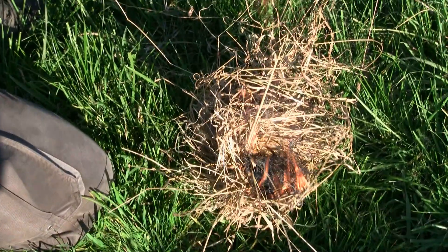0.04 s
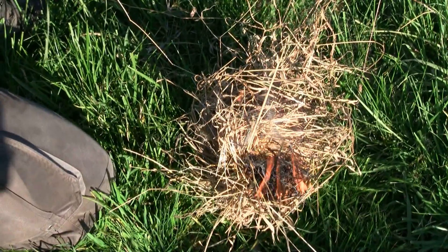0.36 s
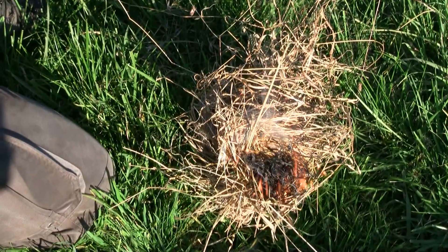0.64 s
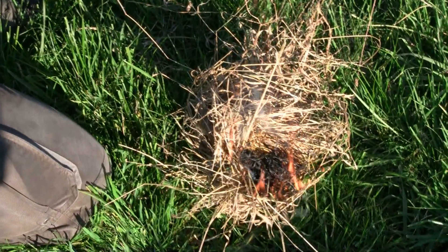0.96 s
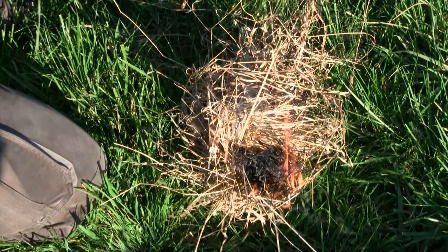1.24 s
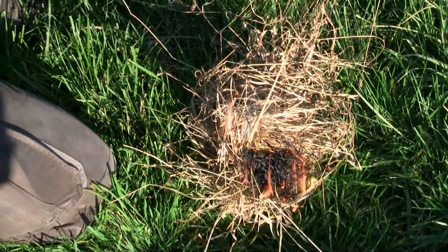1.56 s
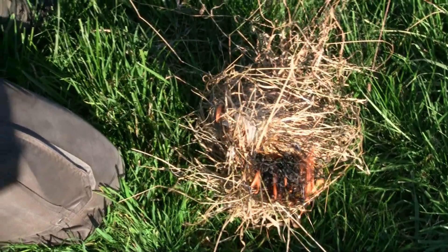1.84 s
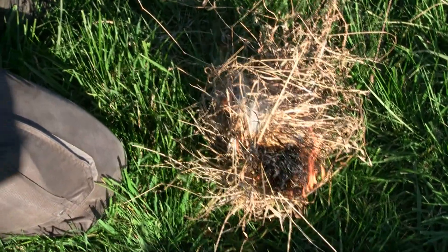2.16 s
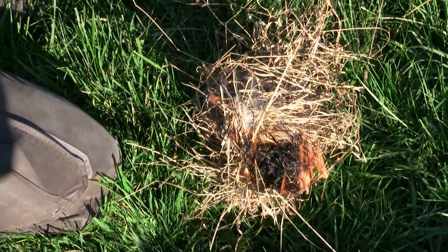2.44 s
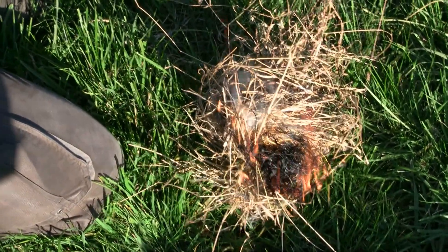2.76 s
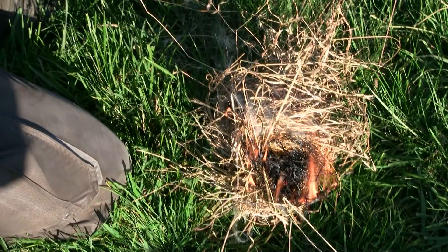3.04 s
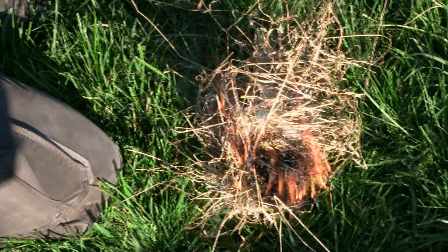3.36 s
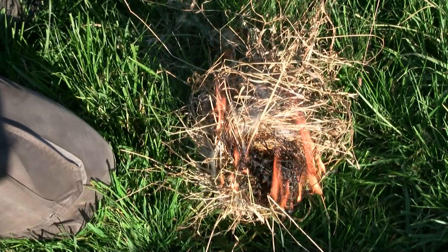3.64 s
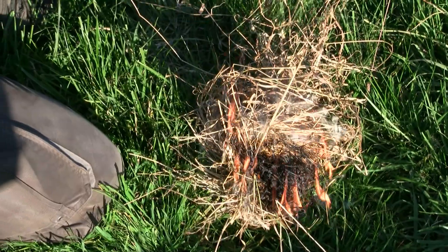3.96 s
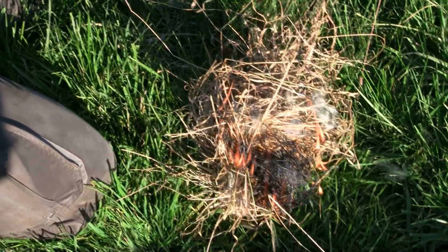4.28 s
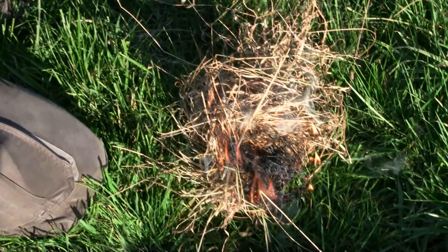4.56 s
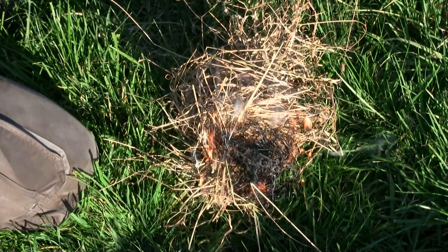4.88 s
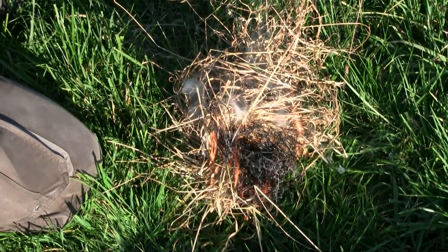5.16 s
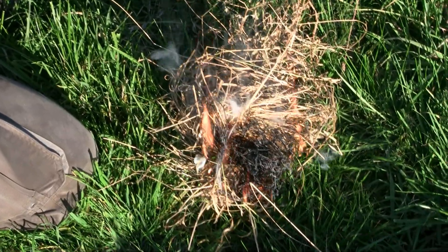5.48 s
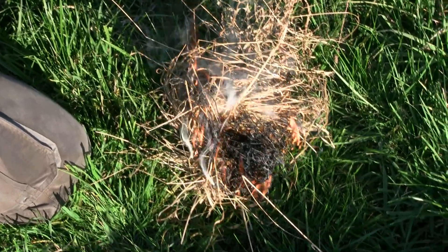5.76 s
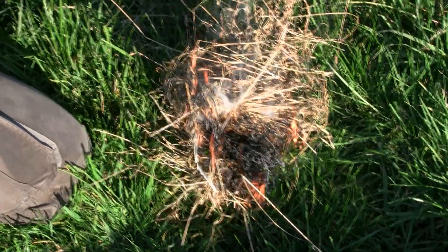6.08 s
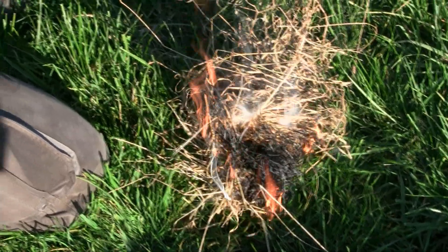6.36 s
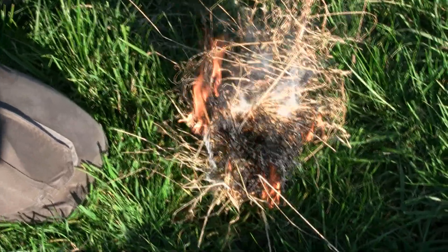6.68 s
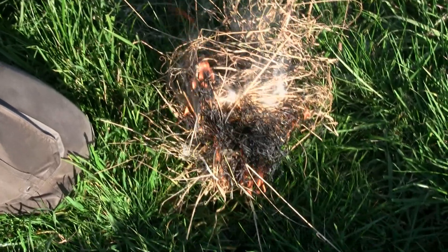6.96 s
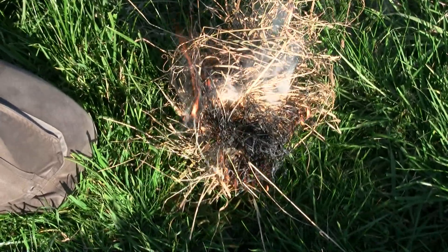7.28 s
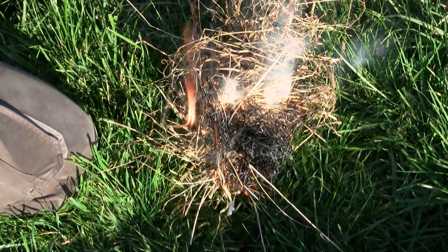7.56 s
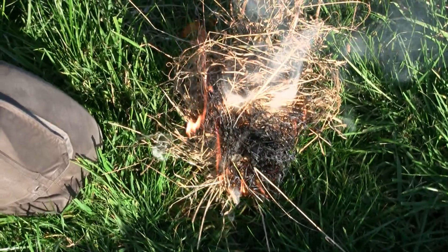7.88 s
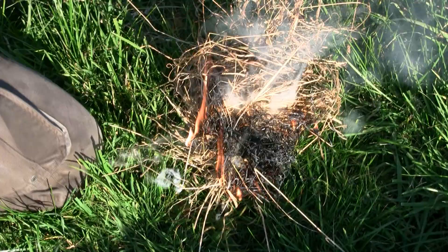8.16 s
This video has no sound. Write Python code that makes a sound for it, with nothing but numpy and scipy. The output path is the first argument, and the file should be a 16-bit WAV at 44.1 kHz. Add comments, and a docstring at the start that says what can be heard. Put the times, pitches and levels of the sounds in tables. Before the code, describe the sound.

Sharp, irregular snaps jump out of the light ticking of a straw fire, heard up close in stereo in the open air. The flame gives one soft puff early on, and damp stalks sputter and sizzle, more so near the end. A few snaps are loud enough to overload briefly. Faint, long, falling bird whistles come and go in the distance, over a steady wash of traffic and humming engines.

```python
"""A small heap of straw burns on a lawn, close to a stereo microphone.
Hollow stalks burst in dry snaps over the fine crackle of fibres, and damp straw vents steam.
Pockets of gas ignite with soft thuds and the flame puffs once; the loudest snaps overload the input.
Far off, a bird of prey whistles in long falling calls, a small bird adds two thin notes,
and two engines drone over a wash of traffic."""
import sys
import numpy as np
from scipy import signal
from scipy.fft import rfft, irfft
from scipy.io import wavfile

SR = 44100
rng = np.random.default_rng(int(sys.argv[2]) if len(sys.argv) > 2 else 0)


def to_wav(s):
    """Save 16-bit WAV."""
    ch = np.atleast_2d(s).T  # columns
    pcm = np.round(np.clip(ch, -1, 1) * 32767)  # PCM
    wavfile.write(sys.argv[1], SR, pcm.astype(np.int16))


N = 366912
TIME = np.arange(N) / SR

# bursting stalks: (time [s], level [dB], thump [dB], body [dB], treble [dB],
# resonance of the hollow stalk [Hz], delay of the ground echo [s])
STALK_BURSTS = [(0.164, -28, -5, 1, -1, 6480, .00099), (0.226, 6.5, -7, 0, -11, 6340, 0.00071),
                (.2291, 0.5, -2, -4, 2, 7000, 0.00066), (0.4578, 12.5, -6.5, 3, -13.5, 13200, 0.00064),
                (.5187, -28, -5, -4, 6, 5560, 0.00073), (.6755, -27.5, -5, -7, -9, 7000, 0.00074),
                (.7419, 4.5, -2.5, -2, 1.5, 5900, 0.00081), (0.7823, 13.5, -3, 0.5, -9, 3420, 0.000745),
                (0.926, -25.5, -5, 14.5, -31, 2200, 0.00044), (1.0971, -25, -5, -6, -1, 5560, 0.00086),
                (1.1347, -22, -8, -14, -1, 6000, .00081), (1.2124, -31.5, -5, 0, 0, 4080, .00033),
                (1.2588, -33, -5, 0, 5, 5560, 0.00081), (1.5753, 4.5, -0.5, 1.5, -4.5, 10200, 0.00075),
                (1.6842, -20.5, -5, 7, 3, 4410, 0.00035), (1.7184, -21, -5, 3, -8, 4760, .0008),
                (1.7318, -11.5, -6, -5, -5.5, 1890, 0.00081), (1.824, -30.5, -5, -4, 5, 6000, 0.00078),
                (1.9255, 9, -2, 4, -10, 4100, 0.00054), (2.1001, 13, -17, -3.5, -11.5, 15000, 0.00055),
                (2.1186, -5.5, 4, 5, -6, 3870, .00056), (2.5927, -18, 3, 1, -1, 9520, .00081),
                (2.697, -19.5, -2, -9, -8, 2700, 0.00054), (2.801, -31, -5, -2, 6, 6100, .0007),
                (2.8265, -27.5, -3, -2, 1, 5140, .00083), (2.8647, -20.5, -5, 4, -5, 3440, .00042),
                (2.9661, -6.5, -17, 0, -12.5, 5450, 0.00078), (3.1293, 5.5, -6.5, -1, -10, 8500, 0.00061),
                (4.0119, -21.5, -3, -13, 3, 6480, .00035), (4.1986, -10.5, 10, 3, -1, 5140, 0.00064),
                (4.259, -23.5, -5, -2, 5, 5140, .00032), (4.3588, -22.5, -5, 4, -1, 2040, .00083),
                (4.3794, -24, -5, -4, 8, 6000, .00073), (4.6031, 3, 6, 1.5, 1.5, 3000, 0.00049),
                (4.6646, -18.5, -7, -8, -2, 5560, .0008), (4.8046, -29.5, -5, 2, 1, 6480, 0.00039),
                (4.8537, -16, 2, 2, -13, 10290, .00061), (4.914, 16.5, -1.5, 0, -10.5, 6900, 0.00045),
                (5.2497, -8.5, 12.5, 8, -8.5, 10100, 0.0005), (5.272, -26, -5, -3, 3, 9500, 0.00057),
                (5.528, -26.5, -7, 13, -4, 4760, .00056), (5.5697, -24.5, -9, -5, -13, 5130, .00081),
                (5.604, -22, -7, -6, -9, 8160, .0012), (5.6848, -1.5, -15, -1, -9.5, 3300, 0.00039),
                (5.717, -24.5, -5, 0, 3, 3780, .00065), (5.7416, -26, -5, -6, -11, 7000, .00083),
                (6.1016, 4, -1, 2.5, -4, 14600, 0.00037), (6.1774, -6.5, -17, 1.5, -18, 9520, 0.00081),
                (6.271, 0, 6.5, -1, -8, 3780, 0.00072), (6.3049, -6.5, 6.5, 8, -8, 9520, 0.00051),
                (6.453, -29.5, -5, 2, 4, 5560, .00091), (6.587, -22.5, -5, -6, 3, 5540, 0.00083),
                (6.7054, -4.5, -3, 6, -5, 5430, 0.00065), (6.8561, -38, -3, -4, 15, 5560, .00038),
                (6.8928, 18.5, -4.5, 2, -13.5, 8500, 0.000728), (7.0067, -32, -8, 6, 7, 6000, .0006),
                (7.0107, -16.5, 6, 16, -10, 3040, 0.00036), (7.0516, 1, -3, 10.5, -15.5, 2800, .00046),
                (7.2936, -4.5, 0.5, -1, -8, 5700, 0.00076), (8.0941, -27, -5, 16, 7, 6000, 0.00049)]


def snaps():
    """Stalks burst close to the microphone, each with its own colour and place in the heap."""
    out = np.zeros((2, N))
    for s, db, *colour, echo_s in STALK_BURSTS:
        add(out, s, amp(db) * signal.fftconvolve(crack(*colour), heap_paths(echo_s), axes=1))
    return out


def crack(thump_db, body_db, treble_db, stalk_hz, ring_db=6, ring_octaves=0.14, size=1024):
    """The pressure pulse of one bursting stalk at both microphone ports."""
    # colour common to all stalks: (frequency [Hz], level [dB])
    straw_colour = [(30, -12), (150, -4), (330, -1), (700, -2), (1400, 2.5), (2100, -0.5), (3000, 3),
                    (4700, 0), (6000, 1.5), (7600, 0), (15500, 1.5)]
    # imbalance of the ports: (frequency [Hz], left minus right [dB])
    port_balance = [(4000, -0.1), (6500, 3), (9000, -7.5), (11000, -1.5), (13000, 10), (15500, -2.5)]
    hz = np.fft.rfftfreq(size, 1 / SR)
    tone = [(350, thump_db), (1400, body_db), (3200, 0.0053), (6000, 0.011), (11500, treble_db)]
    ring = ring_db * np.exp(-(np.log2((hz + 1) / stalk_hz) / ring_octaves) ** 2)
    sides = np.outer([.5, -.5], curve_at(port_balance, hz))
    db = curve_at(straw_colour, hz) + curve_at(tone, hz) + ring + sides
    log_gain = np.log(amp(np.hstack([db, db[:, -2:0:-1]])))
    minimum_phase = np.exp(np.conj(signal.hilbert(log_gain)))  # nothing sounds ahead of the burst
    return -np.fft.ifft(minimum_phase).real


def heap_paths(echo_s, ground_gain=0.39, straw_db=-8.5, lawn_db=-19.5):
    """Paths from a stalk to the microphone: through the heap, across the lawn, direct, off the ground."""
    paths = amp(straw_db) * scatter(.0014, .96) + amp(lawn_db) * scatter(.008, .6)
    paths[:, 0] += 1  # direct sound
    paths += ground_gain * np.sinc(np.arange(paths.shape[1]) - echo_s * SR)
    return paths / np.linalg.norm(paths[0])


def crackle(level_db=-41.0, spread_db=4.0, ceiling_db=12, ticks_per_s=42, fibres=12):
    """Thin fibres tick at random, faster as the fire flares; few ticks are large."""
    # flames reach fresh straw: (centre [s], half length [s], extra ticks [1/s])
    flares = [(1.15, 0.061, 90), (1.68, 0.24, 220), (2.92, 0.22, 67), (5.546, 0.19, 160), (6.848, 0.35, 29)]
    out = np.zeros((2, N))
    rate = ticks_per_s + sum(extra * swell(s, half_s) for s, half_s, extra in flares)
    for bright, place, bore in rng.random((fibres, 3)):
        sizes = amp(np.minimum(spread_db * rng.exponential(1, N), ceiling_db))
        impulses = sizes * (rng.random(N) < rate / fibres / SR)
        pulse = crack(thump_db=-8, body_db=-8, treble_db=-10 + 10 * bright, stalk_hz=3500 + 7000 * bore)
        tick = signal.fftconvolve(pulse, heap_paths(0.00032 + 0.000567 * place), axes=1)
        out += signal.oaconvolve(impulses[None], tick, axes=1)[:, :N]
    return amp(level_db) * out


def steam(sputter_db=1.9, vent_db=-55, vent_s=0.0086, vent_limit_db=5):
    """Damp stalks vent in swelling, sputtering, sizzling jets, and every burst lets out a short hiss."""
    # jets of steam: (centre [s], half length [s], level [dB], sizzle against the hiss [dB])
    jets = [(.32, 0.033, -56.5, 3), (.535, 0.036, -62.5, -1), (0.846, 0.051, -58, -9),
            (1.72, 0.028, -57.5, -11), (2.191, 0.024, -58, 1.5), (4.514, .019, -59, -5),
            (5.027, 0.077, -57, -9), (5.387, .055, -60.5, -12), (5.6, .061, -67, -8),
            (7.366, 0.13, -54, -5.5), (7.885, .063, -52.5, -10), (7.7, .36, -61, -10),
            (8.148, .31, -59.5, -13)]
    # hiss of escaping steam: (frequency [Hz], relative level [dB])
    hiss_spectrum = [(500, -21), (1500, 9), (3000, 4), (4300, 0.5), (6500, 1), (7800, -5.5), (9000, -2),
                     (11500, -4), (15500, -7)]
    # sizzle of a narrow split in a stalk: (frequency [Hz], relative level [dB])
    sizzle_spectrum = [(3000, -30), (5500, -2), (6900, 0.5), (8300, -3), (12000, -20)]
    hiss_power = sum(amp(db) ** 2 * swell(s, half_s) for s, half_s, db, _ in jets)
    sizzle_power = sum(amp(db + extra_db) ** 2 * swell(s, half_s) for s, half_s, db, extra_db in jets)
    vent_decay = np.exp(-TIME[:SR // 4] / vent_s)
    for s, db, *_ in STALK_BURSTS:
        add(hiss_power, s, amp(min(db, vent_limit_db) + vent_db) ** 2 * vent_decay)
    hiss = np.sqrt(hiss_power) * noise(hiss_spectrum, likeness=0.58)
    sizzle = np.sqrt(sizzle_power) * noise(sizzle_spectrum, likeness=0.74)
    return (hiss + sizzle) * amp(sputter_db * wander(250))


def thuds(rise_cycles=0.36):
    """Each pocket of gas ignites and pushes the air for a cycle or two."""
    # igniting pockets: (time [s], pitch [Hz], level [dB])
    gas_pockets = [(2.9677, 225, -30), (4.604, 275, -34), (6.2716, 280, -35), (6.708, 225, -36.5),
                   (7.011, 330, -32)]
    out, t = np.zeros(N), np.arange(2048) / SR
    for s, hz, db in gas_pockets:
        age = t * hz / rise_cycles
        add(out, s, amp(db) * age * np.exp(1 - age) * np.sin(2 * np.pi * hz * t))
    return out


def puff(start_s=1.646, attack_s=0.015, hold_s=.03, spread_s=0.00383, level_db=-37, fade_db_per_s=110,
         note_hz=275, rise_hz_per_s=7200, note_width_hz=90, whoosh_hz=820, whoosh_width_hz=760):
    """Gas catches fire: a hollow note that rises and spreads into a short, dull whoosh."""
    t = np.maximum(TIME - start_s, 0)
    broken = .5 + .5 * np.tanh((t - hold_s) / (2 * spread_s))  # 0 = note, 1 = whoosh
    hz = (1 - broken) * (note_hz + rise_hz_per_s * t) + broken * whoosh_hz
    width = (1 - broken) * note_width_hz + broken * whoosh_width_hz
    smear = wander(564) * width / 2
    note = np.sqrt(2) * np.sin(2 * np.pi * np.cumsum(hz + smear) / SR)
    flutter = amp(np.minimum(width / 200, 4) * wander(200) - 0.5)
    envelope = np.minimum(t / attack_s, 1) * amp(level_db - fade_db_per_s * t)
    return signal.sosfilt(signal.butter(4, 1300, fs=SR, output="sos"), note * flutter * envelope)


def birds(flutter_db=2.8, echo_db=-7):
    """Two birds whose pitch shakes where the voice turns hoarse, blurred by echoes from distant trees."""
    # bird of prey: (time of top note [s], fall [s], top pitch [Hz], drop [Hz], drop time [s],
    # sag [Hz/s], head [dB], tail [dB], hoarseness [0-1])
    prey_calls = [(-.25, 0.44, 2750, 300, .08, 324, -60, -68.5, .15),
                  (2.655, 0.77, 2763, 475, .115, 493, -55.5, -72, 0.08),
                  (4.23, 0.594, 2706, 210, .065, 997, -58, -57.5, 0.37),
                  (4.85, 0.41, 2740, 220, 0.16, 1203, -76, -66, 0.08),
                  (5.96, 0.54, 2763, 420, 0.096, 420, -59.5, -66, 0.17),
                  (7.645, .41, 2567, 250, .06, 431, -57, -63.5, 0.26),
                  (8.18, .2, 2700, 200, .11, 600, -66.5, -55, .14)]
    # small bird: (time [s], length [s], pitch [Hz], level [dB])
    high_notes = [(6.198, 0.28, 7620, -76), (6.5, 0.16, 7220, -74)]
    calls = [whistle(*row) for row in prey_calls] + [thin_note(*row) for row in high_notes]
    out = np.zeros(N)
    flutter, shake = flutter_db * wander(38), .04 * wander(150)
    for on, hz, db, hoarse in calls:
        turns = np.cumsum(hz * (1 + hoarse * shake[on])) / SR
        envelope = amp(db + flutter[on]) * signal.windows.tukey(on.sum(), .08)
        out[on] += np.sqrt(2) * envelope * np.sin(2 * np.pi * turns)
    trees = signal.oaconvolve(out[None], scatter(0.035, 0.12, size=16384), axes=1)[:, :N]
    return out + amp(echo_db) * trees


def whistle(top_s, fall_s, top_hz, drop_hz, drop_s, sag_hz_per_s, head_db, tail_db, hoarse,
            scoop_s=.075, scoop_hz=475):
    """The course of a call: it scoops up to its top note, breaks hoarsely, then sags in a long tail."""
    on = (TIME > top_s - scoop_s) & (TIME < top_s + fall_s)
    t = TIME[on] - top_s
    falling = drop_hz * (1 - np.exp(-(t / drop_s) ** 2)) + sag_hz_per_s * t
    hz = top_hz - np.where(t < 0, scoop_hz * (t / scoop_s) ** 2, falling)
    db = tail_db + (head_db - tail_db) * swell(top_s, half_s=0.14)[on]
    voice_break = swell(top_s + .1, half_s=0.043)[on]
    return on, hz, db, hoarse * (1 + 2 * voice_break)


def thin_note(s, length_s, hz, db, sag_hz_per_s=700, hoarse=0.71):
    """The course of a small bird's note: even, hoarse and sinking a little."""
    on = (TIME > s) & (TIME < s + length_s)
    return on, hz - sag_hz_per_s * (TIME[on] - s), db, hoarse


def receding_engine(end_hz=19.45, excess_hz=1.08, settle_s=4.0, level_db=-49.0, fade_db_per_s=0.5):
    """A far engine slowly fades while its shaft settles to a slightly lower speed."""
    # orders of the shaft: (multiple, level [dB])
    shaft_orders = [(3, -25), (4, -14.5), (5, 0.5), (6, -10.5), (7, -11), (9, -23), (10, -20.5),
                    (12, -15.5)]
    shaft_hz = end_hz + excess_hz * np.exp(-TIME / settle_s)
    return engine(shaft_hz, level_db - fade_db_per_s * TIME, shaft_orders)


def nearing_engine(start_hz=87, sag_hz_per_s=.6, level_db=-60, grow_db_per_s=0.76,
                   throttle_s=7.45, rev_hz_per_s=4.35, throttle_db=3, open_s=0.19):
    """A second engine grows louder as its speed sags, then opens the throttle and picks up."""
    # harmonics of the firing rate: (multiple, level [dB])
    firing_orders = [(1, 1), (2, -1), (3, -18.5)]
    since_throttle = np.maximum(TIME - throttle_s, 0)
    firing_hz = start_hz - sag_hz_per_s * TIME + rev_hz_per_s * since_throttle
    db = level_db + grow_db_per_s * TIME + throttle_db * np.minimum(since_throttle / open_s, 1)
    return engine(firing_hz, db, firing_orders)


def engine(hz, db, orders, fading_db=1.15, drift_rad=0.39):
    """Orders of a far engine, each fading and drifting on its way through the air."""
    angle = 2 * np.pi * np.cumsum(hz) / SR
    out = np.zeros(N)
    for multiple, order_db in orders:
        gain = amp(order_db + fading_db * wander(3.4))
        out += gain * np.sin(round(multiple) * angle + drift_rad * wander(5.4))
    return np.sqrt(2) * amp(db) * out


def far_traffic(roar_db=-51.0, rumble_db=-53, air_db=-65):
    """Tyre roar that swells as distant cars pass, over a low rumble and a thin, even hiss."""
    # passing cars: (time when nearest [s], half length [s], level [dB])
    cars = [(.1, .25, -57), (3.204, .38, -52), (4.3, 0.23, -55.5), (6.31, 0.52, -50), (8.0, 0.81, -55)]
    # spectra of tyres, rumble and open air: (frequency [Hz], relative level [dB])
    tyre_spectrum = [(150, -14), (400, -8.5), (650, -2), (950, 0.5), (1200, -2.5), (1600, -8), (2200, -13),
                     (3200, -22), (6000, -30.5)]
    rumble_spectrum = [(20, -38), (35, -32), (50, -20), (70, -0.5), (95, -6), (160, -3), (230, -4.5),
                       (330, -6), (550, -12.5), (1500, -37)]
    air_spectrum = [(500, 9), (2500, -2.5), (4500, 1.5), (6000, 4.5), (7500, -5), (9000, 2), (11500, -5),
                    (15500, -11)]
    power = amp(roar_db) ** 2 + sum(amp(db) ** 2 * swell(s, half_s) for s, half_s, db in cars)
    roar = noise(tyre_spectrum) * np.sqrt(power) * amp(.5 * wander(27))
    rumble = noise(rumble_spectrum) * amp(rumble_db + 0.65 * wander(22))
    return roar + rumble + amp(air_db) * noise(air_spectrum)


def scatter(decay_s, likeness, size=2048, rise_s=.0005):
    """A dying stereo cloud of small reflections, of energy 1."""
    t = np.arange(size) / SR
    shared, own = rng.standard_normal(size), rng.standard_normal((2, size))
    cloud = np.sqrt(likeness) * shared + np.sqrt(1 - likeness) * own
    envelope = np.exp(-t / decay_s) * (1 - np.exp(-t / rise_s))
    return unit_rms(cloud * envelope) / np.sqrt(size)


def noise(spectrum, likeness=None):
    """Stereo noise of rms 1; diffuse unless a left-right likeness is given."""
    # diffuse sound at the microphone: (frequency [Hz], left-right likeness [0-1])
    diffuse_likeness = [(60, 0.91), (130, 1), (290, 0.038), (640, 0.47), (1400, 0.75), (3100, 0.24),
                        (7000, 0.13), (15000, 0.083)]
    hz = np.fft.rfftfreq(N, 1 / SR)
    left, other = rfft(rng.standard_normal((2, N)))
    same = curve_at(diffuse_likeness, hz) if likeness is None else likeness
    right = same * left + np.sqrt(1 - same ** 2) * other
    return unit_rms(irfft(np.array([left, right]) * amp(curve_at(spectrum, hz)), N))


def wander(rate_hz):
    """Random drift of rms 1, rolled off above the given rate."""
    hz = np.fft.rfftfreq(N, 1 / SR)
    return unit_rms(irfft(rfft(rng.standard_normal(N)) / (1 + (hz / rate_hz) ** 4), N))


def swell(s, half_s):
    """A smooth rise and fall around time s, of height 1."""
    return np.exp(-((TIME - s) / half_s) ** 2)


def amp(db):
    """Decibels to gain."""
    return 10 ** (np.asarray(db) / 20)


def unit_rms(x):
    """Scales to an rms of 1."""
    return x / np.sqrt(np.mean(x ** 2) + 1e-20)


def curve_at(points, hz):
    """Interpolates a curve on a log-frequency axis."""
    point_hz, values = np.transpose(points)
    return np.interp(np.log(hz + 1), np.log(point_hz + 1), values)


def add(mix, s, sound):
    """Mixes a sound in at time s."""
    part = mix[..., max(round(s * SR), 0):][..., :sound.shape[-1]]
    part += sound[..., :part.shape[-1]]


def scene():
    """The fire close in front, birds and traffic far behind."""
    fire = snaps() + thuds() + crackle() + steam() + puff()
    return fire + birds() + receding_engine() + nearing_engine() + far_traffic()


def record(dry, threshold_db=-7, recovery_db_per_s=100, slope=0.24, attack_s=.008,
           low_cut_hz=33, high_cut_hz=16100):
    """The loudest snaps make the recorder's gain dip briefly and clip its input; filters trim the band."""
    over_db = np.maximum(20 * np.log10(abs(dry).max(0) + 1e-9) - threshold_db, 0)
    recovery = TIME * recovery_db_per_s
    held_db = np.maximum.accumulate(over_db + recovery) - recovery
    lag = np.exp(-1 / (attack_s * SR))
    dip_db = slope * signal.lfilter([1 - lag], [1, -lag], held_db)
    clipped = np.clip(dry / amp(dip_db), -.9, .9)
    low_cut = signal.butter(3, low_cut_hz, "highpass", fs=SR, output="sos")
    high_cut = signal.firwin(511, high_cut_hz, window=("kaiser", 9), fs=SR)
    return signal.oaconvolve(signal.sosfilt(low_cut, clipped), high_cut[None], "same")


dry = scene()
out = record(dry)
to_wav(out)
```